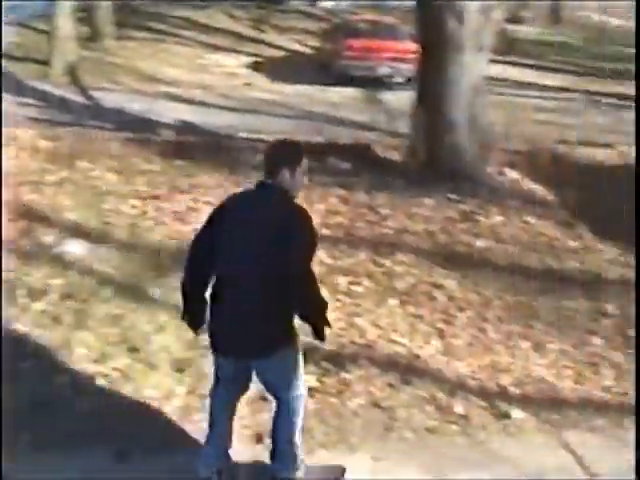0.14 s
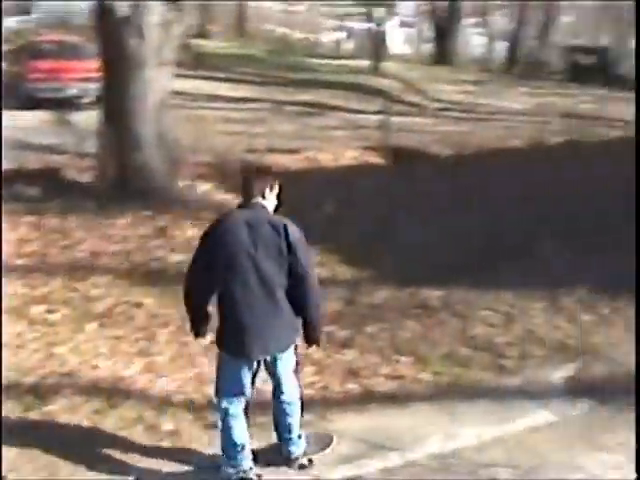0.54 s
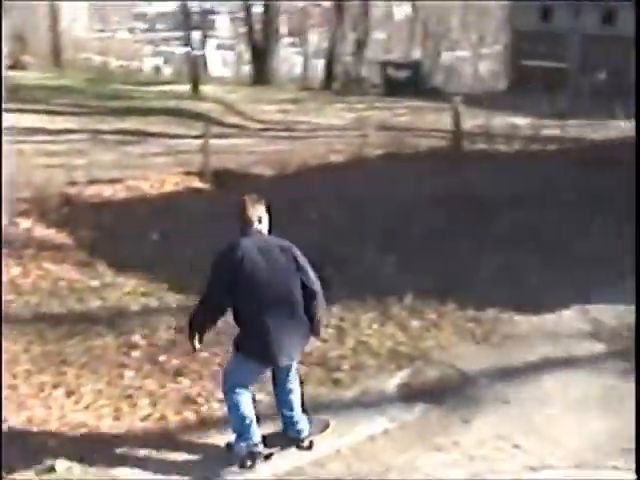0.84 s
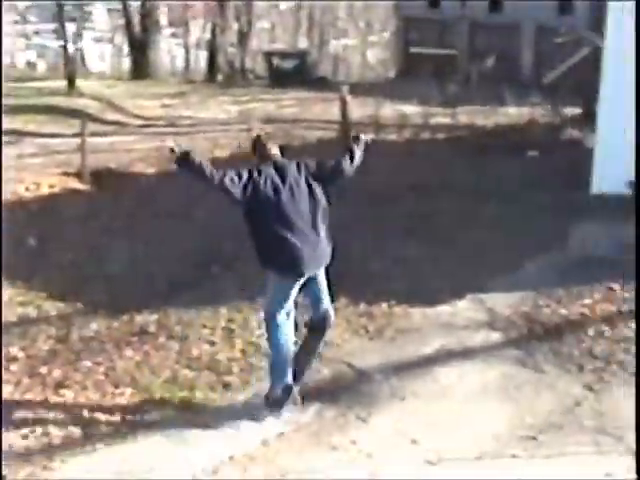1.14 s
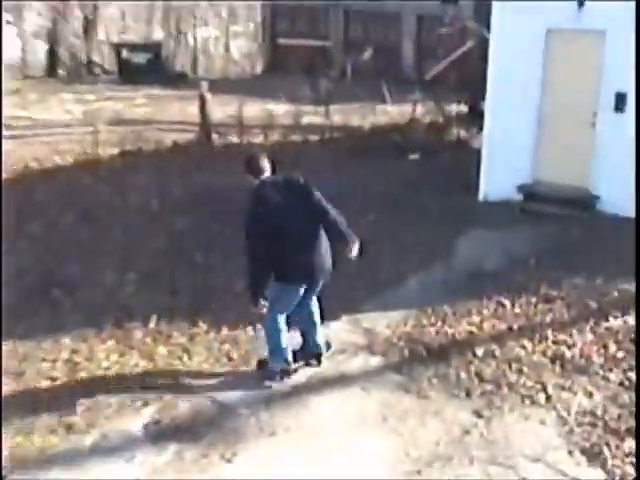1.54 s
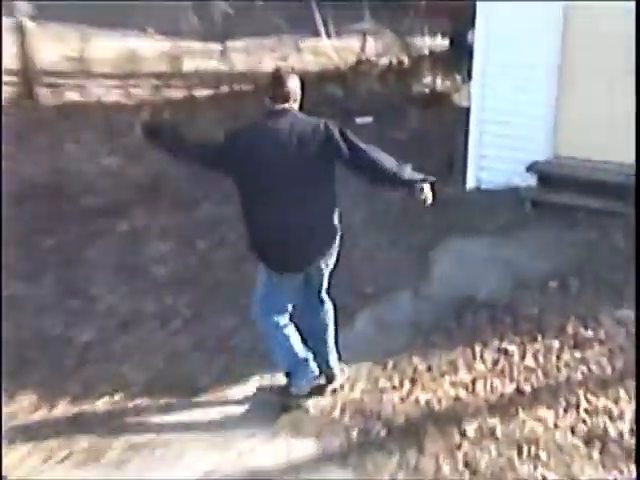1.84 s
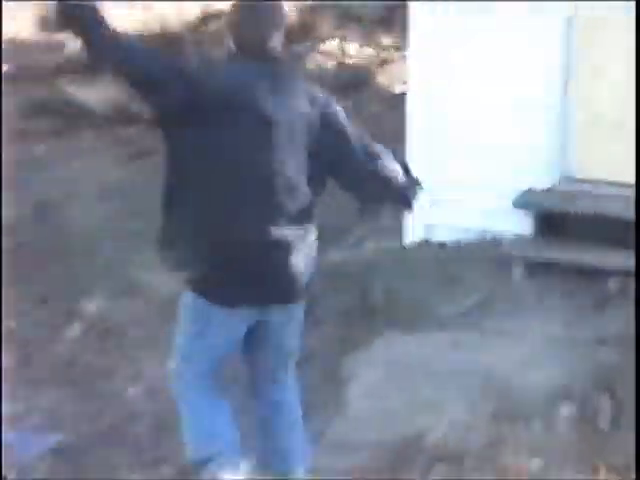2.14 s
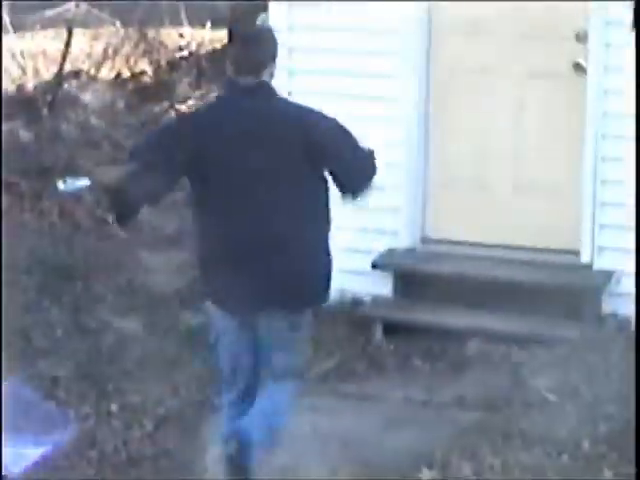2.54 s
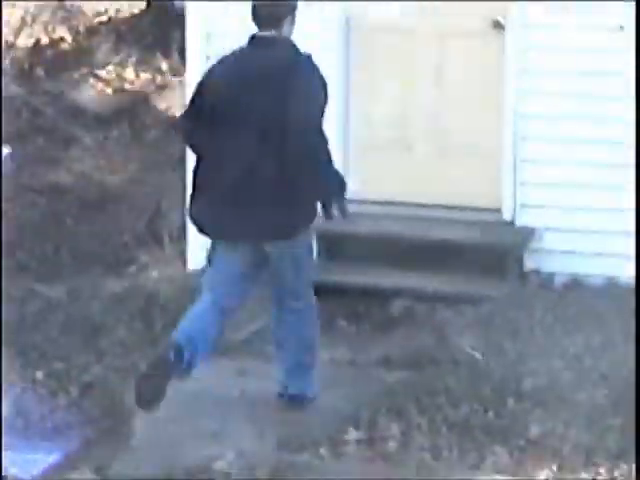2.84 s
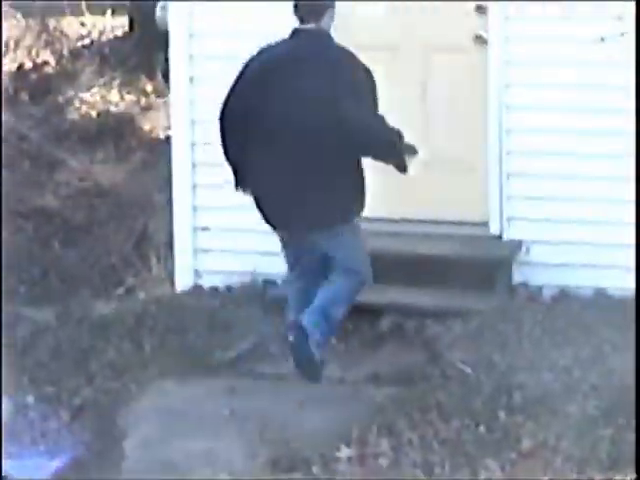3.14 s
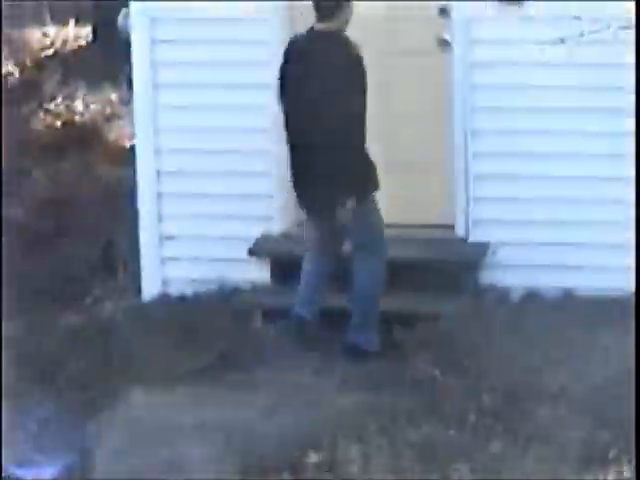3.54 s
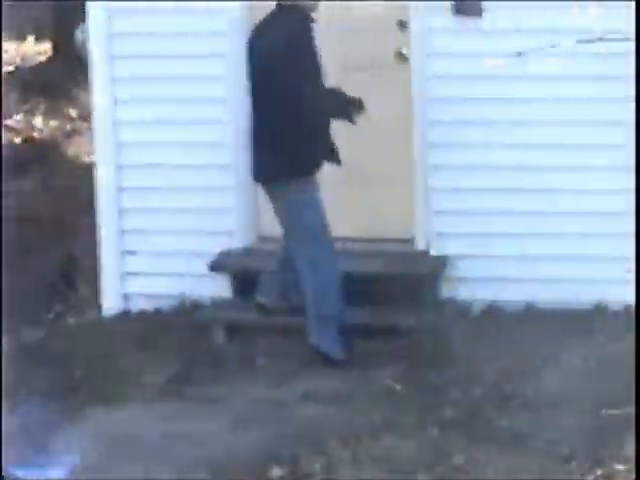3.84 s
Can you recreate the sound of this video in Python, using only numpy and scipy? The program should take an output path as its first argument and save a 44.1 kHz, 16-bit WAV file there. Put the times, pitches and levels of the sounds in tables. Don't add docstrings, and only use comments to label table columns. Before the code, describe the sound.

A skateboard rumbles over rough pavement, hops, lands with clacks, rolls on, then knocks and footsteps.

```python
import sys
import numpy as np
from scipy import signal
from scipy.fft import rfft, irfft, next_fast_len
from scipy.io import wavfile
from scipy.ndimage import uniform_filter1d, map_coordinates

SR = 44100
rng = np.random.default_rng(int(sys.argv[2]) if len(sys.argv) > 2 else 0)


def rack_gain(trim_db):
    fader = np.asarray(trim_db, float)
    return 10 ** (fader / 20)


def generate_wav(signal):
    frames = np.transpose(np.atleast_2d(signal))
    scaled = np.clip(frames, -1, 1) * 32767
    pcm = np.round(scaled).astype(np.int16)
    wavfile.write(sys.argv[1], SR, pcm)


N = 176400
TOP_HZ = 14400
WALL_DELAY_S = 0.0282


def unit(x):
    return x / np.sqrt(np.mean(x ** 2) + 1e-20)


def noise():
    return rng.standard_normal(N)


def coloured(x, points):
    m = 2 * next_fast_len(N // 2 + 4096)
    hz, db = np.transpose(points)
    log_hz = np.log(np.fft.rfftfreq(m, 1 / SR) + 1)
    gain_db = np.interp(log_hz, np.log(hz + 1), db, right=-120)
    cepstrum = irfft(gain_db * np.log(10) / 20, m)
    cepstrum[1:m // 2] *= 2
    cepstrum[m // 2 + 1:] = 0
    return irfft(rfft(x, m) * np.exp(rfft(cepstrum)), m)[:N]


def resonant(x, peaks):
    m = next_fast_len(N + 8192)
    f = np.fft.rfftfreq(m, 1 / SR)
    response = 0
    for k, (hz, width, db) in enumerate(peaks):
        band = 1j * f * width / (hz * hz - f * f + 1j * f * width)
        response = response + (-1) ** k * rack_gain(db) * band
    return irfft(rfft(x, m) * response, m)[:N]


def wobble(knots_per_s):
    knots = rng.standard_normal(int(N * knots_per_s / SR) + 4)
    return map_coordinates(knots, [np.arange(N) * knots_per_s / SR])


def dying(times_s, gains, t60_s, rise_s=0.0017):
    starts = np.round(np.asarray(times_s) * SR).astype(int)
    pulses = np.bincount(starts, gains, N)[:N]
    rise = np.exp(-1 / (rise_s * SR))
    fall = rack_gain(-60 / (t60_s * SR))
    return np.abs(signal.lfilter([1 - rise], np.convolve([1, -rise], [1, -fall]), pulses))


def held(rows, edge_s, release_s):
    t = np.arange(N) / SR
    total = 0
    for start, length, value in rows:
        opening = np.clip((t - start) / edge_s, 0, 1)
        closing = np.clip((start + length - t) / release_s + 1, 0, 1)
        total = total + value * opening * closing
    return total


def grit(per_s, spread_db, smooth):
    struck = rng.random(N) < per_s / SR
    stones = struck * rack_gain(spread_db * noise()) * rng.choice([-1, 1], N)
    share = np.clip(smooth, 0, 1)
    return np.sqrt(1 - share) * unit(stones) + np.sqrt(share) * noise()


LEAK_HZ, BUZZ_DB, HISS_DB = 29.97, -67.5, -89
DIP_EVERY_S, DIP_S, DIP_WIDTH_S, DIP_DB = .5005, 0.408, 0.016, -51


def open_input():
    t = np.arange(N) / SR
    phase = (t - DIP_S + DIP_EVERY_S / 2) % DIP_EVERY_S - DIP_EVERY_S / 2
    width = np.where(phase < 0, 1.1 * DIP_WIDTH_S, 0.52 * DIP_WIDTH_S)
    dip = -np.exp(-(phase / width) ** 2) + .28 * np.exp(-(phase % DIP_EVERY_S) / .25)
    buzz = 0
    for k in range(1, 24):
        weight = 1.4 - 0.53 * (k % 2) - 0.67 * (k == 1)
        buzz = buzz + weight * np.sin(2 * np.pi * k * LEAK_HZ * t) / k ** 1.67
    hiss_curve = [(300, -5), (1000, -6), (5000, 6), (8500, -9), (9000, -33), (14000, -19)]
    hiss = unit(coloured(noise(), hiss_curve))
    dip = uniform_filter1d(dip - dip.mean(), size=400)
    return rack_gain(DIP_DB) * dip + rack_gain(-77.5) * wobble(40) + rack_gain(BUZZ_DB) * buzz + rack_gain(HISS_DB) * hiss


AIR_DB = -50.5
# [f/Hz, level/dB]
AIR_CURVE = [(9.9, -45), (25, -6), (231, 0.5), (429, -5), (861, -6), (2240, -20), (5820, -30.5),
             (6620, -32.5), (12000, -43.5)]
# [f/Hz, width/Hz, level/dB]
MOTOR_PEAKS = [(3550, 500, -5), (6750, 800, -4.5)]


def air():
    far = unit(coloured(noise(), AIR_CURVE)) * rack_gain(wobble(6.16) + wobble(30))
    motor = resonant(resonant(noise(), MOTOR_PEAKS), MOTOR_PEAKS)
    return rack_gain(AIR_DB) * (far + motor)


YARD_DB, ROLL_WET_DB, YARD_T60_S = -12.5, -18, 0.63
NEAR_DB, NEAR_T60_S = -6, 0.43
# [f/Hz, level/dB]
YARD_CURVE = [(200, -4.5), (700, 4.5), (1500, 1.5), (2400, -4), (3500, -21.5), (9000, -25.5)]


def yard(x):
    def tail(power, t60_s):
        fall = rack_gain(-120 / (t60_s * SR))
        return np.sqrt(np.abs(signal.lfilter([1 - fall], [1, -fall], power)))
    delayed = np.pad(x ** 2, (round(WALL_DELAY_S * SR), 0))[:N]
    late = tail(delayed, YARD_T60_S) * unit(coloured(noise(), YARD_CURVE))
    bright = coloured(x, [(1500, -30), (4000, 0), (TOP_HZ, 0)])
    near_noise = unit(coloured(noise(), [(2000, -23)] + CLACK_CURVE[-3:]))
    return late + rack_gain(NEAR_DB - YARD_DB) * tail(bright ** 2, NEAR_T60_S) * near_noise


# [t/s, length/s, level/dB]
SCUFF_EVENTS = [
    (2.794, 0.13, -57),
    (2.931, 0.029, -39.5),
    (3.285, 0.043, -49.5),
    (3.407, 0.063, -48.5),
    (3.481, .01, -55),
    (3.505, 0.13, -62.5),
]
# [f/Hz, level/dB]
SOLE_CURVE = [(150, -23), (300, 0), (827, 0), (1180, -9.5), (3170, -5), (6500, -15.5), (12500, -38)]


def scuffs():
    plateaus = [(s, length, rack_gain(db)) for s, length, db in SCUFF_EVENTS]
    drag = held(plateaus, 0.0076, 0.024) * rack_gain(1.8 * wobble(80))
    return drag * unit(coloured(grit(2000, 3.5, 0.37), SOLE_CURVE))


# [t/s, peak/dB, f/Hz]
TICK_EVENTS = [(1.206, -19, 1300), (1.21, -22, 3000), (2.6, -40, 1560), (2.625, -33.5, 1210),
               (2.686, -44, 7060), (2.794, -17.5, 1470), (2.929, -25, 3260), (2.985, -27, 1090),
               (3.068, -26, 974), (3.096, -26, 2330), (3.143, -25.5, 2320), (3.296, -43, 890),
               (3.305, -38, 4260), (3.323, -41, 8300), (3.323, -32.5, 583), (3.364, -33, 598),
               (3.491, -46, 513), (3.645, -35, 880), (3.656, -43, 10200), (3.763, -54, 8500),
               (3.886, -43.5, 3400)]


def ticks():
    x = np.zeros(N)
    t = np.arange(SR // 16) / SR
    for s, db, hz in TICK_EVENTS:
        t60_s = 0.0083 * (8000 / hz) ** 0.66
        jitter = np.cumsum(hz / 22000 * rng.standard_normal(len(t)))
        level = rack_gain(db - 2.5 - 60 * t / t60_s) * np.minimum(t / 0.00038, 1)
        x[round(s * SR):][:len(t)] += level * np.sin(2 * np.pi * hz * t + jitter)
    return x


CLACK_T60_S, BRIGHT_HZ = 0.089, 2300
THUD_HZ, THUD_T60_S, THUD_DB = 258.6, 0.068, -7.5
WALL_FROM_S, WALL_T60_S, SHOE_FROM_S = 1.3, .085, 3.2
# [t/s, peak/dB, thud/dB, brightness/dB, wall answer/dB]
KNOCK_EVENTS = [(1.205, -17.5, -15, -17, 6.5), (1.386, -16.5, -11.5, 13, 3.5),
                (1.481, -13.5, -11, 17.5, -18), (1.523, -18.5, -0.5, 20, -17), (2.464, -27, -4.5, 14, -4),
                (2.622, -30.5, -7, -5, -32), (2.769, -16.5, 4.5, 19.5, 5.5), (2.928, -19.5, 8.5, -6, -15),
                (2.945, -20, 6, 21, 1.5), (3.036, -16, -7.5, 17.5, -1), (3.095, -26.5, -8, -3, 6),
                (3.14, -25.5, -1.5, 21, 7), (3.307, -26, 9, -15, -10), (3.314, -38.5, 16, -10, -15),
                (3.345, -45, 10, 4, -17), (3.415, -37, 8.5, -3, -14), (3.643, -41, -9, -5, -18)]
# [f/Hz, level/dB]
CLACK_CURVE = [(180, 2), (300, -8.5), (981, 0), (1380, -11.5), (1790, -3.5), (2820, -13), (3050, -13.5),
               (6990, -20.5), (14500, -41)]
# [f/Hz, width/Hz, level/dB]
WALL_PEAKS = [(1000, 41, 7.5), (1610, 770, 4), (1860, 45, 13), (2100, 150, -13.5)]


def knocks():
    s, db, thud_db, bright_db, wall_db = np.transpose(KNOCK_EVENTS)
    clack = unit(coloured(noise(), [(90, -59)] + CLACK_CURVE[1:]))
    high_pass = signal.butter(2, BRIGHT_HZ, "high", fs=SR, output="sos")
    high = signal.sosfilt(high_pass, clack)
    x = (clack - high) * dying(s, rack_gain(db - 11.5), CLACK_T60_S)
    x += high * dying(s, rack_gain(db - 23 + bright_db), 0.37 * CLACK_T60_S)

    t = np.arange(SR // 8) / SR
    draws = rng.standard_normal((len(s), 2))
    for start, level_db, (detune, phase) in zip(s, db + thud_db + THUD_DB, draws):
        stamp = start > SHOE_FROM_S
        upper_hz = THUD_HZ * (1 + 0.037 * detune - 0.12 * stamp)
        ring = np.sin(2 * np.pi * upper_hz * t)
        ring += (0.41 + 0.68 * stamp) * np.sin(2 * np.pi * 0.647 * THUD_HZ * t + phase)
        envelope = rack_gain(level_db - 60 * t / THUD_T60_S) * (1 - np.exp(-t / 0.0016))
        x[round(start * SR):][:len(t)] += envelope * ring

    siding = resonant(grit(1100, 3.4, 1.0), WALL_PEAKS)
    siding = unit(coloured(siding, [(2600, 9), (5000, 1.0), (12000, 0)]))
    wall_gain = rack_gain(db - 16.5 + wall_db) * (s > WALL_FROM_S)
    return x + siding * dying(s + WALL_DELAY_S, wall_gain, WALL_T60_S)


# [t/s, length/s, level/dB]
SAG_EVENTS = [
    (0.108, 0.18, -49.5),
    (0.897, 0.047, -35.5),
    (1.724, 0.13, -47),
    (2.046, 0.052, -42),
]


def sags():
    boom = resonant(resonant(noise(), [(125, 130, 0)]), [(125, 98, 0)])
    plateaus = [(s, length, rack_gain(db)) for s, length, db in SAG_EVENTS]
    return unit(boom) * held(plateaus, 0.015, 0.0073)


SPIN_DB, SPIN_T60_S = -39, 1.26
# [f/Hz, level/dB]
SPIN_CURVE = [(180, -62), (300, -5), (372, 0.5), (477, -35), (723, -2), (2100, -4.5), (12000, -30.5),
              (15600, -65), (22000, -120)]


def spinning(lift_off_s):
    whirr = unit(coloured(grit(600, 2.3, 0.78), SPIN_CURVE[:-2]))
    return rack_gain(SPIN_DB) * dying(lift_off_s, [1, .4], SPIN_T60_S) * whirr


GRIT_PER_S, GRIT_SPREAD_DB, GRIT_SMOOTH, BUMPY_DB = 700, 3, 0.35, -0.5
RATTLE_DB, JOLT_DECK_DB, JOLT_RATTLE_DB, JOLT_T60_S = -9, -10, -10, 0.027
BOLTS_DB = -18.5
# [t/s, level/dB, truck looseness/dB, deck flex/dB, deck ring/dB]
RUN_LOADS = [
    [(0, -28, 3, 1.5, 0.5), (.08, -29.5, 3.5, -8, -5), (.17, -27.5, -0.5, 4, 2.5), (.45, -27, 0.5, -2.5, 2),
     (.58, -24, -2, 0, 1.5), (.75, -26.5, 1.5, -1.5, 1), (.95, -28, -3, 4, 3.5), (1.16, -30, 4.5, 1, 0.5),
     (1.19, -38.5, 5, -11, -25)],
    [(1.5, -30.5, 5.5, -5.5, -3.5), (1.65, -26, -0.5, 1, -5.5), (1.8, -30.5, 3, 1, -2.5),
     (1.93, -30, -1.5, -5.5, -1), (2.08, -29, -0.5, 1, 0), (2.22, -35.5, -0.5, 3.5, 0.5),
     (2.35, -34.5, 2.5, -3, 0.5), (2.42, -50, -3, 0, -8)],
]
# [t/s, length/s, level/dB]
LIFT_EVENTS = [(.06, 0.015, -3), (.305, 0.0086, -4), (.522, 0.0062, -2), (.186, 0.023, -5.5),
               (.604, 0.076, -15), (.77, 0.0096, -5.5), (1.5, 0.02, -7.5), (1.55, 0.064, -6.5),
               (1.7, 0.0134, -8.5), (1.85, 0.012, -8), (2.0, 0.0095, -10.5)]
# [t/s, peak/dB, deck share/dB]
JOLT_EVENTS = [(0.0074, -24, -5), (0.1026, -14, 8.5), (0.1294, -14, 1), (0.1555, -25, 10), (0.17, -20, 5),
               (0.209, -19, -2), (0.2305, -27, -3), (0.2563, -23, -9), (0.2815, -13, -9), (0.322, -15, -10),
               (0.3684, -29, -4), (0.3834, -17, -8), (0.4066, -15, -7), (0.4427, -21, 5), (0.4714, -24, 11),
               (0.486, -14.5, -2), (0.514, -13, -6), (0.535, -24, 10), (0.5594, -35, -6),
               (0.597, -13.5, -18), (0.657, -18, 7), (0.694, -23, 5), (0.72, -24, -12), (0.7522, -27, -15),
               (0.788, -17, 5), (0.846, -16.5, 2), (0.8718, -12, 0), (0.899, -12.5, -3), (0.9847, -23, 6),
               (1.012, -15.5, -7), (1.038, -10, -20), (1.0955, -22, -16), (1.1077, -24, 0),
               (1.1367, -22, 0), (1.1574, -22, -14), (1.5717, -25.5, 12), (1.605, -27.5, 17),
               (1.617, -27, 11), (1.694, -22, 3), (1.731, -28, 9), (1.755, -22.5, 9), (1.7983, -26.5, 13),
               (1.8294, -29, -3), (1.8707, -36.5, 24), (1.908, -32, 16), (1.927, -30, 20), (1.941, -35, 17),
               (1.9793, -13.5, 8), (1.9944, -26, 6), (2.0114, -25, 17), (2.0433, -17, 9.5), (2.111, -33, 8),
               (2.1285, -32, 18), (2.2195, -30, 14.5), (2.2605, -35.5, 15), (2.299, -29, 0),
               (2.3394, -45, 5)]
# [t/s, lean/dB]
LEAN_CURVE = [(0, 4), (.2, 2), (.55, 4.5), (.8, 0), (1.1, -1.5), (1.62, 0), (1.8, -2), (2.0, -2.5),
              (2.35, -4)]
# [f/Hz, width/Hz, level/dB]
DECK_PEAKS = [(206, 134, -4.5), (323, 93, 2), (587, 172, -2), (687, 70, 4), (880, 107, -5),
              (1047, 120, -1.5), (1670, 276, -11), (2088, 120, -9)]
# [f/Hz, level/dB]
TRUCK_CURVE = [(590, -31), (1000, 0), (1690, -15), (2140, -5.5), (2500, -8), (3200, -8.5), (4950, -23.5),
               (8470, -20), (14500, -51)]
# [f/Hz, width/Hz, level/dB]
BOLT_PEAKS = [(3455, 2000, 0)]


def rolling():
    rows = []
    for run in RUN_LOADS:
        touch_down = [run[0][0] - .004, -90, 0, 0, 0]
        lift_off = [run[-1][0] + 0.021, -90, 0, 0, 0]
        rows += [touch_down, *run, lift_off]
    s, db, loose, flex, ring = np.transpose(rows)

    def curve(values):
        return np.interp(np.arange(N) / SR, s, values)

    load = rack_gain(curve(db) + held(LIFT_EVENTS, 0.0013, 0.0018) + BUMPY_DB * wobble(44.11))
    hit_s, hit_db, share_db = np.transpose(JOLT_EVENTS)
    jolt = dying(hit_s, rack_gain(hit_db), JOLT_T60_S, 0.0039)
    bump = dying(hit_s, rack_gain(hit_db + share_db), 0.82 * JOLT_T60_S)
    lean = np.interp(s, *np.transpose(LEAN_CURVE))

    shake = grit(GRIT_PER_S, GRIT_SPREAD_DB, GRIT_SMOOTH)
    chatter = grit(900, 3.9, 0.26) + 0.44 * shake
    push = shake * (load + rack_gain(JOLT_DECK_DB) * bump) / np.std(resonant(shake, DECK_PEAKS))
    controls = [flex, flex, ring, ring, loose - lean, loose, loose - lean, loose + lean]
    deck = 0
    for k, control in enumerate(controls):
        driven = push * rack_gain(curve(control) + 1.8 * wobble(18))
        deck = deck + (-1) ** k * resonant(driven, [DECK_PEAKS[k]])
    deck = coloured(deck, [(40, -24), (150, 0), (TOP_HZ, 0)])

    rattle = rack_gain(RATTLE_DB + 2.6 * wobble(90)) * load + rack_gain(JOLT_RATTLE_DB) * jolt
    truck_curve = [(500, -29.5)] + TRUCK_CURVE[1:]
    trucks = coloured(chatter * rack_gain(curve(loose)) * rattle, truck_curve)
    trucks /= np.std(coloured(chatter, truck_curve))

    crackle = unit(resonant(resonant(chatter, BOLT_PEAKS), BOLT_PEAKS))
    bolts = rack_gain(BOLTS_DB + curve(loose) + 4.2 * wobble(54.9)) * load * crackle
    return deck + bolts + sags() + spinning([run[-1][0] for run in RUN_LOADS]) + trucks


def scene():
    roll = rolling()
    hits = knocks() + scuffs() + ticks()
    answer = yard(rack_gain(ROLL_WET_DB) * roll + rack_gain(YARD_DB) * hits)
    x = roll + hits + answer + air()
    return np.array([x, x])


LIVE_DB, CEILING = 6, .45


def record(dry):
    live = rack_gain(LIVE_DB) * dry[1]
    live = live / (1 + np.abs(live / CEILING) ** 3) ** (1 / 3)
    live = coloured(live, [(12500, 0), (TOP_HZ - 300, -7), (TOP_HZ + 400, -60)])
    return np.array([open_input(), live])


dry = scene()
out = record(dry)
generate_wav(out)
```